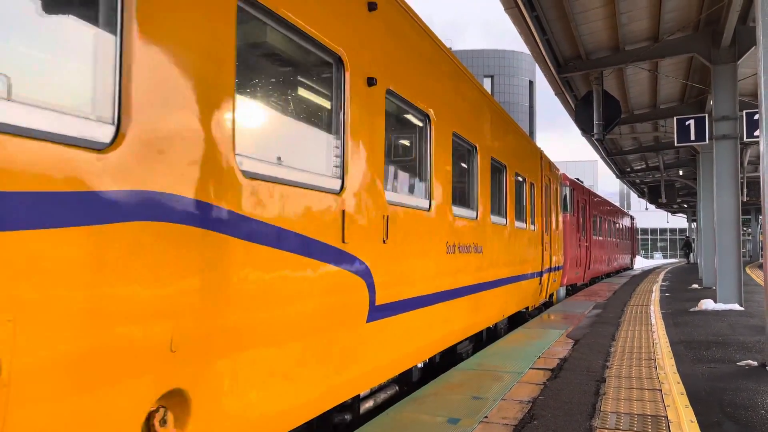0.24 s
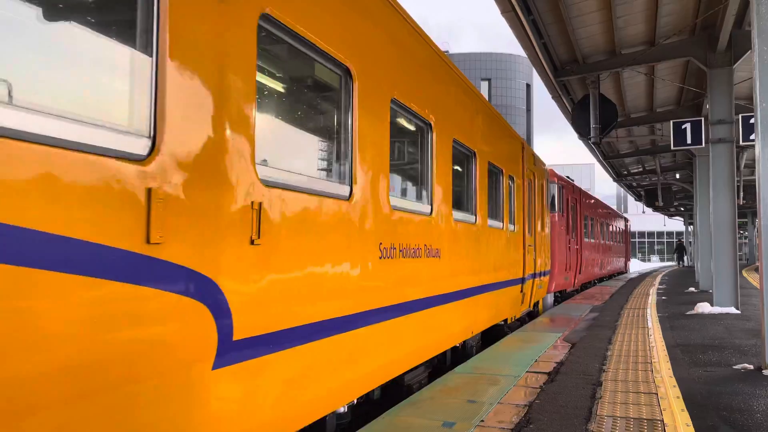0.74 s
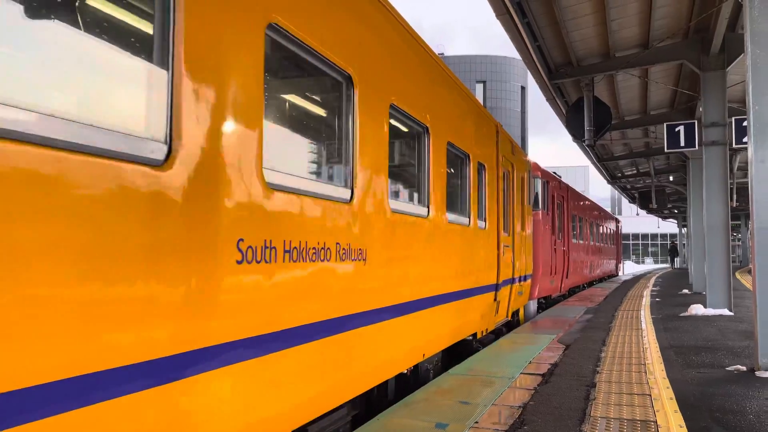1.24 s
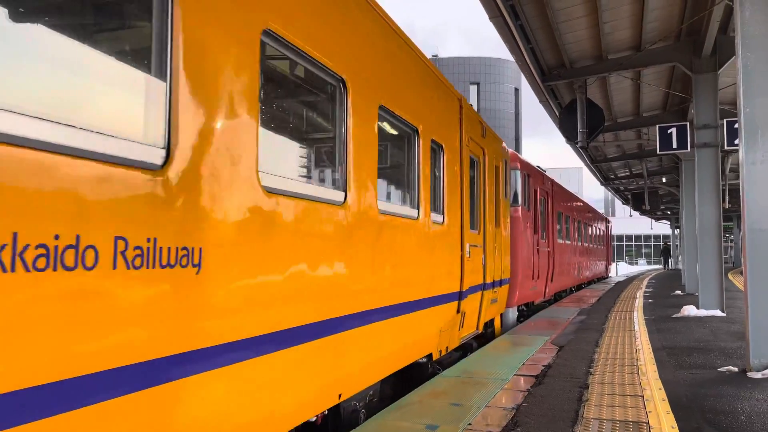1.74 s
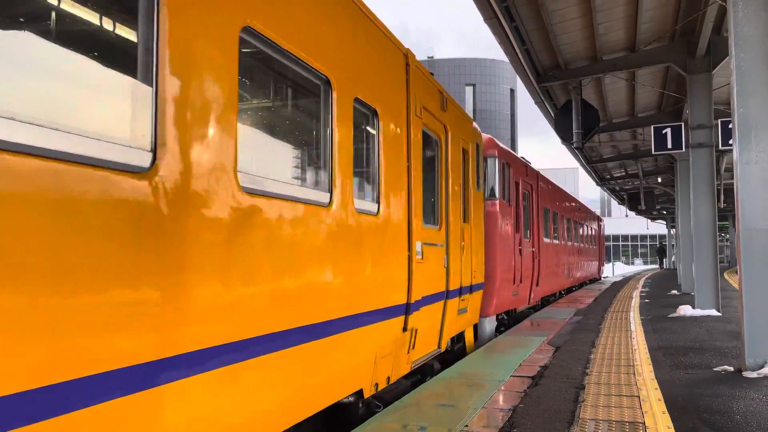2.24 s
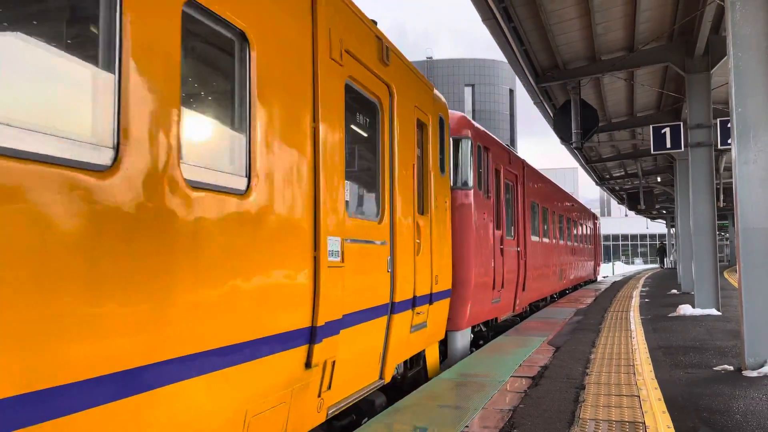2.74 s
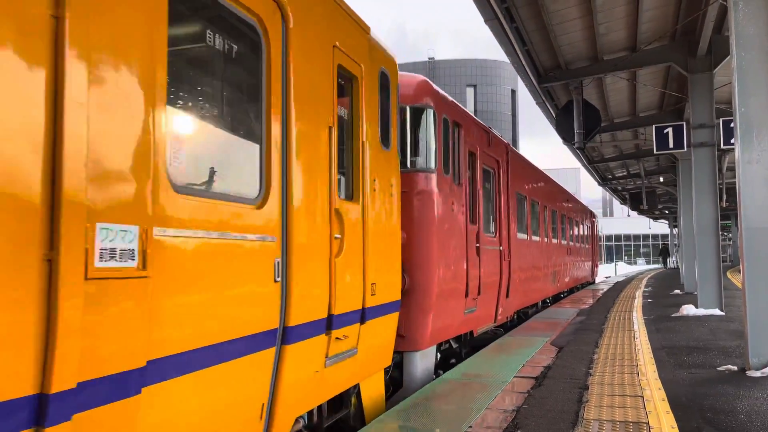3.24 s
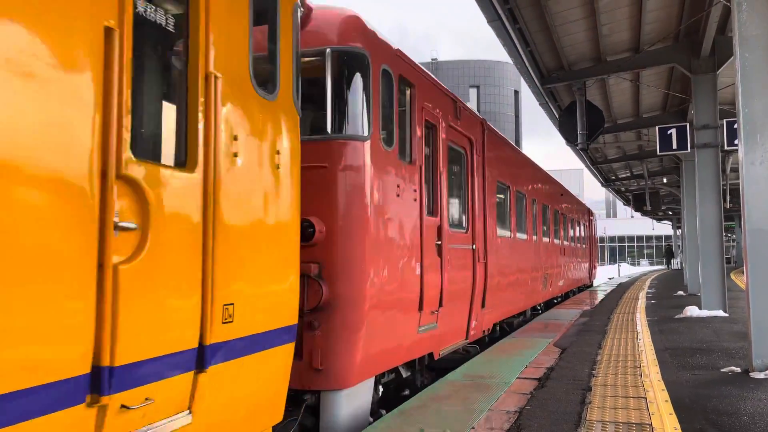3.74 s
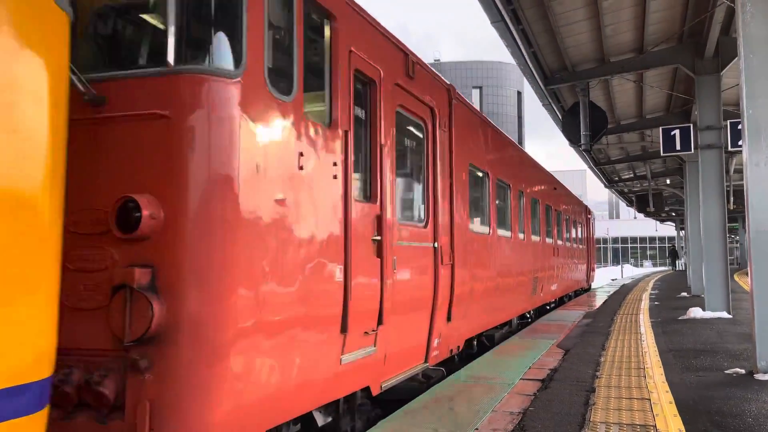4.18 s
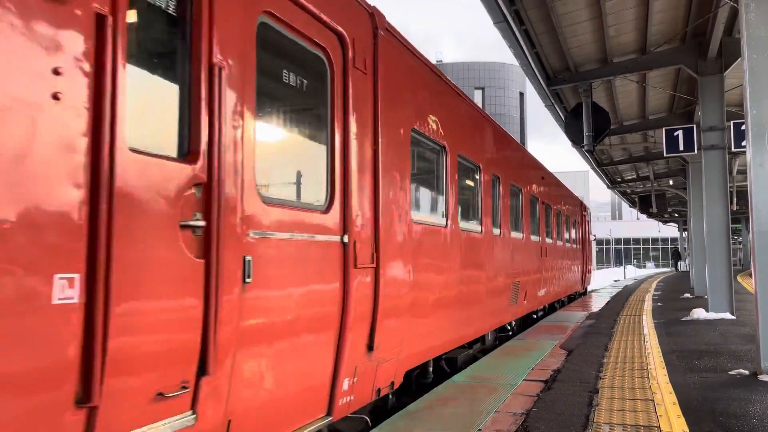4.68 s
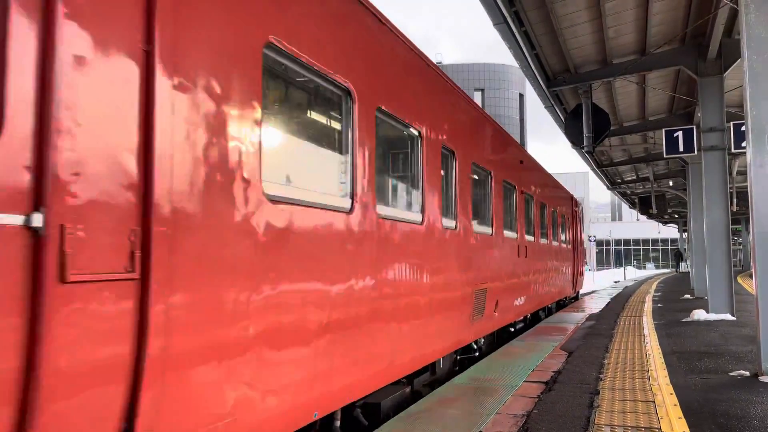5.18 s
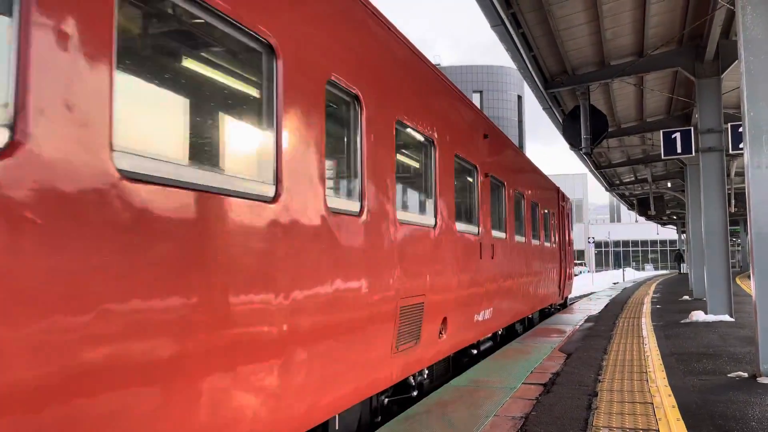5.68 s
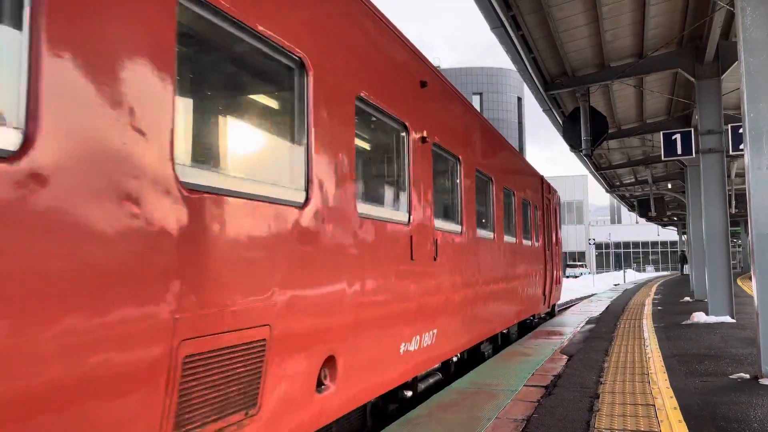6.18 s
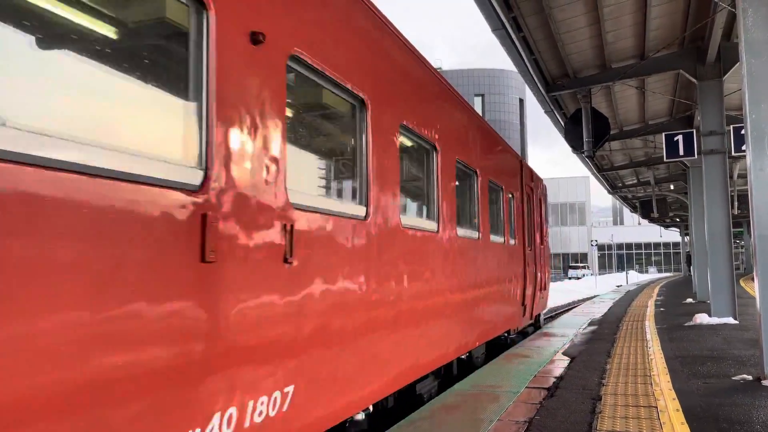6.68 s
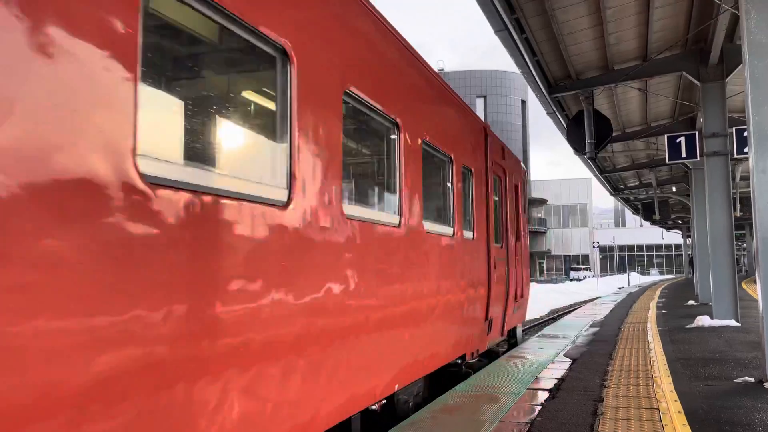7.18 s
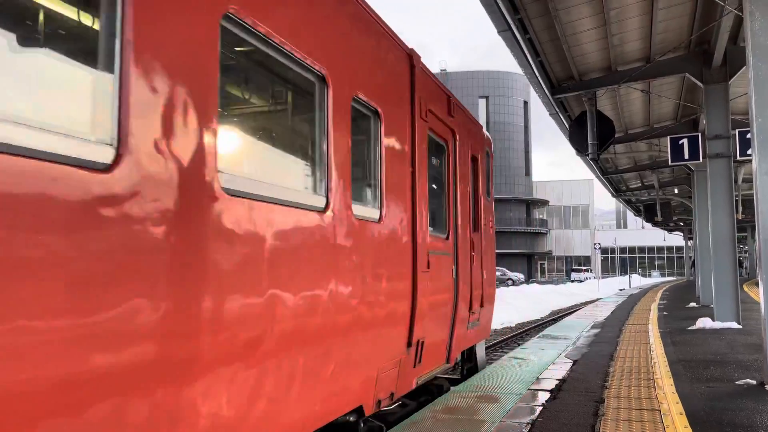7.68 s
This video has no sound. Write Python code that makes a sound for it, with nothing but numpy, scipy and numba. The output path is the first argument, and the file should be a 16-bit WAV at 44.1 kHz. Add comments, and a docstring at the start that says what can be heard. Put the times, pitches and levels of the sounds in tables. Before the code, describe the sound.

Two diesel railcars accelerate past a handheld stereo phone on a roofed platform, close enough for under-floor detail. From 0 s the front engine growls low and unsteadily while the rear one idles beneath; wheel rumble, fan hiss and fluttering roar swell. Soft joint thuds come near 0.1 and 0.5 s, with a short air puff at 0.5 s. Metallic clatter and ticks peak between 1.2 and 2.9 s, with sharper casing knocks around 2.1 to 3 s. The rear engine then revs upward, swelling to a deep, heavy boom at about 3.9 s, wavering and staying strong until 5.4 s. Gear whine climbs with speed; further thuds fall near 3.6, 5.5 and 5.9 s. After 6 s the boom fades under rumble, a steady low hum and another wave of engine-room roar and hiss near 7 s. A thin, high fluttering air whistle emerges around 7.5 s and continues to the end, as the train is still passing.

```python
"""A diesel engine already pulling growls at the front while the one behind it idles: two railcars leaving.
The rear engine revs up and booms as its exhaust comes level; under-floor roar, clatter and gear whine pass by.
Joint thuds come now and then; a puff of air comes early, and an air valve whistles near the end.
Engines, hum and gear are sine tones locked to shafts; roar, clatter and air are filtered noise.
Two microphone ports hear it all with reflections from roof and platform."""
import sys
import numpy as np
from scipy import signal
from scipy.fft import rfft, irfft
from scipy.io import wavfile
from scipy.ndimage import uniform_filter1d, map_coordinates
from numba import njit

SR = 44100
rng = np.random.default_rng(int(sys.argv[2]) if len(sys.argv) > 2 else 0)


def to_linear_factor(level_db):
    """Convert decibel levels (scalar or array-like) to linear amplitude factors."""
    exponent = np.asarray(level_db, float) / 20
    return 10 ** exponent


def output_pcm(signal):
    """Save a mono or channel-first signal as 16-bit PCM at the path in sys.argv[1].

    Samples are clipped to [-1, 1] before scaling.
    """
    pcm = np.clip(np.atleast_2d(signal).T, -1, 1) * 32767
    wavfile.write(sys.argv[1], SR, np.round(pcm).astype(np.int16))


N = 349272
T = np.arange(N) / SR
HZ = np.fft.rfftfreq(N, 1 / SR) + 1e-3  # kept above zero for the logarithm


def curves(table):
    """Columns of a table joined by straight lines in time."""
    s, *columns = np.transpose(table)
    return [np.interp(T, s, column) for column in columns]


def unit(x):
    """Scale to rms 1."""
    return x / np.sqrt(np.mean(x ** 2))


def over_hz(table, column=1):
    """A table column read on a log-frequency axis."""
    table = np.array(table, float)
    return np.interp(np.log(HZ), np.log(table[:, 0]), table[:, column])


def noise():
    """Two unrelated noises: the direct sound and what comes back from roof and platform."""
    return rng.standard_normal((2, N))


def coloured(x, points):
    """Filter by (pitch_hz, relative_db) points, silent beyond the ends, then scale to rms 1."""
    inside = (HZ > points[0][0]) & (HZ < points[-1][0])
    return unit(irfft(rfft(x) * to_linear_factor(over_hz(points)) * inside, N))


@njit
def svf(x, hz, width):
    """State-variable band-pass whose centre may move."""
    y, band, low = np.empty(len(x)), 0., 0.
    for i in range(len(x)):
        g, k = np.tan(np.pi * hz[i] / SR), width / hz[i]
        v = (band + g * (x[i] - low)) / (1 + g * (g + k))
        band, low, y[i] = 2 * v - band, low + 2 * g * v, k * v
    return y


def ring(pair, hz, width_hz):
    """A steep resonance on both noises: two equal band-passes in a row."""
    hz, width_hz = hz + 0 * T, float(width_hz)
    return unit(np.array([svf(svf(x, hz, width_hz), hz, width_hz) for x in pair]))


def walk(rate):
    """Random levels held 1 / rate s and slewed twice; spread 1."""
    hold = int(SR / rate)
    steps = np.repeat(rng.standard_normal(N // hold + 1), hold)
    return unit(uniform_filter1d(uniform_filter1d(steps, hold), hold)[:N])


def burst(events, decay_s):
    """Envelope of sudden starts that die away."""
    return sum(to_linear_factor(db) * (T >= s) * np.exp(-np.clip(T - s, 0, None) / decay_s) for s, db in events)


def orders(hz, db, others, waver_db, wander_hz):
    """Tones locked to a shaft: the main one and its other orders, each wavering on its own."""
    turn = np.cumsum(hz + wander_hz * walk(6)) / SR
    tones = 0
    for k, level_db in [(1, db)] + others:
        # higher orders are rougher
        level = to_linear_factor(level_db + waver_db * k ** 0.68 * walk(9 * k))
        tones = tones + np.sqrt(2) * level * np.sin(2 * np.pi * (k * turn + rng.random()))
    return tones, turn


def crossing(hz, swells, base_db=0):
    """Each order is loudest on its resonance and 6 dB down half a width away."""
    return [(k, base_db + peak_db - 6 * ((k * hz - res_hz) / half_hz) ** 2)
            for k, res_hz, half_hz, peak_db in swells]


# train speed: time_s, speed_m_s
TRAIN_SPEED = [(0, 4.6), (2.8, 5.34), (4, 5.98), (5.1, 6.7), (7.92, 7.97)]


def passing(parts, falloff, rest_db=-90):
    """Level in dB of parts that slide past at train speed, over what the rest of the train gives."""
    along = np.cumsum(curves(TRAIN_SPEED)[0]) / SR  # metres travelled
    power = sum(to_linear_factor(2 * db) * (1 + ((along - np.interp(s, T, along)) / reach) ** 2) ** -falloff
                for s, reach, db in parts)
    return 10 * np.log10(power + to_linear_factor(2 * rest_db))


# fans sliding past: abreast_s, reach_m, level_db
FANS_PASSING = [(1.5, 9.3, -37), (7.2, 5, -29)]
# fan hiss spectrum: pitch_hz, relative_db
HISS_COLOUR = [(1500, -12), (2700, -6), (3400, -0.5), (4500, -2.5), (5600, -8.5), (7500, -2.5), (9000, -9),
               (11000, -18), (13000, -21.5), (16500, -21)]
# treble lost by the far fans: pitch_hz, relative_db
FAR_FANS_COLOUR = [(1500, 0), (7000, -3), (16500, -7)]


def fan_hiss():
    """Fans stir broadband air noise: near ones pass by over a steady, duller far hiss."""
    near = to_linear_factor(passing(FANS_PASSING, falloff=1.22) + 0.76 * walk(6.5)) * coloured(noise(), HISS_COLOUR)
    far = to_linear_factor(-39) * coloured(coloured(noise(), HISS_COLOUR), FAR_FANS_COLOUR)
    return near + far


# wheels sliding past: abreast_s, reach_m, level_db
WHEELS_PASSING = [(1.7, 7.4, -25.5), (6.8, 13.7, -24.5)]
# wheel rumble spectrum: pitch_hz, relative_db
RUMBLE_COLOUR = [(18, -29), (30, -13), (42, -10), (60, 3), (100, -1.5), (150, -2.5), (220, -4.5), (330, -7),
                 (500, -10), (800, -25.5)]


def wheel_rumble():
    """Rolling wheels give low noise that swells as they pass."""
    level_db = passing(WHEELS_PASSING, falloff=1.13, rest_db=-28.5) + 1.06 * walk(7)
    return to_linear_factor(level_db) * coloured(noise(), RUMBLE_COLOUR)


# engine rooms sliding past: abreast_s, reach_m, level_db
ROOMS_PASSING = [(1.5, 7.6, -21), (2.7, 2.4, -20.5), (7.15, 4.8, -17.5)]
# roar spectrum: pitch_hz, relative_db
ROAR_COLOUR = [(200, -19.5), (350, -5), (600, -1), (950, 0), (1250, -3.5), (1550, -5), (1850, -6),
               (2600, -17.5), (4000, -27)]
# two bands of the roar that flutter on their own: pitch_hz, width_hz, level_db against the roar
ROAR_BANDS = [(981, 280, -10), (1480, 220, -14.5)]


def engine_room_roar():
    """Engine rooms give broad mid-range noise, with two bands that flutter on their own."""
    level_db = passing(ROOMS_PASSING, falloff=1.47, rest_db=-26.0) + 1.02 * walk(4.97)
    bands = sum(to_linear_factor(db + 2.73 * walk(9)) * ring(noise(), hz, width) for hz, width, db in ROAR_BANDS)
    return to_linear_factor(level_db) * (coloured(noise(), ROAR_COLOUR) + bands)


# knocks on the casing: start_s, level_db
CASING_KNOCKS = [(2.115, -31), (2.455, -30), (2.606, -21), (2.64, -23), (2.72, -25), (2.961, -27)]


def ringing_casing(casing_db):
    """A casing resonates on noise, with short knocks on top."""
    level = to_linear_factor(casing_db + 1.15 * walk(14)) + burst(CASING_KNOCKS, decay_s=0.015)
    return level * ring(noise(), hz=2118, width_hz=510)


# two places humming under the rear car: abreast_s, reach_m, level_db
HUM_PASSING = [(6.4, 3.1, -26), (7.75, 5.9, -25.5)]
# hum overtones: order, level_db against the main tone at 7 s
HUM_OVERTONES = [(1 / 2, -18), (3 / 2, -7.5), (2, -4.5), (3, -11.5)]


def under_car_hum():
    """A hum of steady pitch under the rear car; its overtones gain on the main tone."""
    hum_db = passing(HUM_PASSING, falloff=2.2)
    rise_db_per_s = 3.5
    overtones = [(k, hum_db + db + rise_db_per_s * (T - 7)) for k, db in HUM_OVERTONES]
    return orders(145.1, hum_db, overtones, waver_db=1.8, wander_hz=0.097)[0]


# gears sliding past: abreast_s, reach_m, level_db
GEAR_PASSING = [(1.9, 9.2, -31.5), (4.6, 3.1, -30.5)]


def gear_whine():
    """Meshing teeth sound one tone whose pitch follows train speed."""
    hz_per_m_s = 32
    mesh_hz = hz_per_m_s * curves(TRAIN_SPEED)[0]
    return orders(mesh_hz, passing(GEAR_PASSING, falloff=3.0), [], waver_db=0.5, wander_hz=0.3)[0]


# wheels over rail joints: start_s, level_db before the thud's envelope, pitch_hz
RAIL_JOINTS = [(.126, -8, 285), (.457, -10, 141), (3.605, -2, 170), (5.452, 0, 290), (5.936, -11, 280)]


def joint_thuds():
    """Wheels thud over rail joints: short sines, softly struck and quickly damped."""
    out = 0
    for s, db, hz in RAIL_JOINTS:
        after = np.clip(T - s, 0, None)
        envelope = np.exp(-after / .005) * (1 - np.exp(-after / .003))
        out = out + to_linear_factor(db) * np.sin(2 * np.pi * hz * after) * envelope
    return out


def air_puff():
    """One short puff of air: a softened burst of noise."""
    puff = uniform_filter1d(burst([(0.53, -22)], decay_s=0.065), size=600)
    return puff * coloured(noise(), [(500, -4), (1500, 0), (3000, 3), (6000, -9), (12000, -21)])


# whistling air valve sliding past: abreast_s, reach_m, level_db
VALVE_PASSING = [(7.53, 2.47, -25.5), (7.9, 4.5, -25.5)]


def valve_whistle():
    """Air through a narrow gap whistles: noise in a narrow resonance, fluttering."""
    level_db = passing(VALVE_PASSING, falloff=3.2) + 1.5 * walk(35)
    return to_linear_factor(level_db) * ring(noise(), hz=5105, width_hz=120)


# valve gear sliding past: abreast_s, reach_m, level_db
CLATTER_PASSING = [(1.2, 8.4, -34.5), (2.5, 6.2, -33)]
# cover resonances: pitch_hz at the start, width_hz, relative_db
COVER_MODES = [(3770, 430, -1.5), (6140, 380, -6), (7420, 490, -3), (8630, 2800, -7)]
# sharper ticks: start_s, level_db at onset
CLATTER_TICKS = [(1.32, -37), (1.714, -32), (2.174, -33), (2.3705, -32), (2.5546, -33), (2.7194, -39),
                 (2.7995, -38), (2.9194, -33)]


def valve_clatter(turn, front_hz):
    """Rear firings shake the covers, every third harder; cover pitch follows the front engine."""
    rise = np.minimum(front_hz / front_hz[0], 1.12)
    knock = turn / 3 + .3
    size = to_linear_factor(3.0 * rng.standard_normal(N // 100))[knock.astype(int)]  # no two knocks alike
    gate = 0.72 + 0.78 * size * np.exp(-(knock % 1) / 0.44) + .3 * np.exp(-(turn % 1) / .3)
    drive = gate * to_linear_factor(1.3 * walk(6.04)) * noise()
    covers = sum(to_linear_factor(db) * ring(drive, hz * rise, width) for hz, width, db in COVER_MODES)
    tick_colour = [(4000, -15), (6200, -2), (9500, -1), (11000, -10), (13500, -24)]
    ticks = burst(CLATTER_TICKS, decay_s=0.039) * coloured(noise(), tick_colour)
    return to_linear_factor(passing(CLATTER_PASSING, falloff=2.13)) * unit(covers) + ticks


# front engine firing tone: time_s, pitch_hz, level_db
FRONT_FIRING = [(0, 69.75, -30.5), (.65, 70.4, -27), (1.1, 70.3, -36.5), (1.5, 70.76, -29),
                (2.1, 71.3, -29.5), (2.4, 71.9, -24.5), (2.8, 74, -26), (3.5, 78.6, -20), (3.8, 81.7, -31),
                (4.1, 82.6, -40), (5, 86.5, -45), (7, 92, -44), (7.4, 89.5, -35), (7.92, 85, -38)]
# its other orders: order, resonance_hz, half_width_hz, peak_db against the firing tone
FRONT_RESONANCES = [(1 / 2, 46, 3.7, 2), (3 / 2, 105.7, 3.6, -7), (3 / 2, 136.8, 7.4, 2.4), (2, 142, 4, -5),
                    (2, 178, 8.4, 1)]


def front_engine():
    """Firing tone of the engine already pulling; other orders swell as they cross resonances."""
    hz, db = curves(FRONT_FIRING)
    tones, _ = orders(hz, db, crossing(hz, FRONT_RESONANCES, db), waver_db=2.5, wander_hz=0.37)
    return tones, hz


# rear engine firing tone: time_s, pitch_hz, level_db before the dips
REAR_FIRING = [(0, 44.83, -34.5), (2.4, 45.87, -35), (2.95, 52.04, -29), (3.2, 55.8, -23),
               (3.48, 60.5, -17.5), (3.9, 65.67, -7.5), (4.02, 67.37, -11), (4.4, 71.5, -16),
               (4.6, 73.46, -14), (4.8, 75.1, -11.5), (5.3, 78.13, -10), (5.45, 79.1, -14),
               (5.74, 79.94, -27), (5.9, 80, -23), (6.2, 81.2, -32), (6.5, 82.37, -24), (7.92, 84.4, -38)]
# its other orders on pipe or panel resonances: order, resonance_hz, half_width_hz, peak_db
REAR_RESONANCES = [(2, 102, 4.5, -29.5), (3 / 2, 105.2, 3, -20.5), (2, 125.7, 2.5, -25.5),
                   (2, 142.5, 6, -22.5), (2, 164.5, 2, -30.5), (3, 217, 5, -30), (3, 229, 6, -25.5),
                   (43 / 6, 431, 7, -28.5), (41 / 6, 435, 8, -27.5), (13 / 2, 439.2, 9.5, -20),
                   (19 / 3, 446, 5.5, -29), (17 / 3, 440, 3.3, -27), (49 / 6, 495, 8.5, -31),
                   (47 / 6, 499, 11, -31.5), (15 / 2, 501, 6.3, -26), (19 / 3, 502, 6.1, -33.5)]
# brief dips in the boom: centre_s, depth_db
BOOM_DIPS = [(4.08, -9), (4.25, -5)]


def rear_engine():
    """Firing tone from idle to boom; other orders swell as they cross a pipe or panel resonance."""
    hz, db = curves(REAR_FIRING)
    dip_s = 0.038  # from a dip's centre to 1/e of its depth
    db = db + sum(depth * np.exp(-((T - s) / dip_s) ** 2) for s, depth in BOOM_DIPS)
    return orders(hz, db, crossing(hz, REAR_RESONANCES), waver_db=1.25, wander_hz=0.248)


# the two microphone ports: pitch_hz, left_minus_right_db, likeness_0_to_1, left_lead_rad
PORT_PAIR = [(60, 0, .995, 0), (200, 0, .93, .15), (450, 1.8, .72, .2), (900, 1, .62, .3),
             (1400, .6, .42, .3), (1800, -3, .3, 0), (2200, 0, .65, 0), (3200, 2.8, .5, .8),
             (4700, 1, .6, .1), (5700, 1.5, .3, -.3), (6500, 1, .4, -2.6), (6950, 0, .99, -3.14),
             (8200, 0, .99, -3.14), (8500, 0, .7, -3.8), (9800, 0, .65, -5.3), (10300, 0, .99, -6.28),
             (12200, 0, .99, -6.28), (13000, 0, .3, -8.5), (13800, 0, .995, -9.42)]


def ports(direct, back, lag_ms):
    """The right port hears the direct sound shifted in phase and mixed with reflections; lows reach it late."""
    tilt_db, like, lead = (over_hz(PORT_PAIR, column=k) for k in (1, 2, 3))
    like = np.clip(like, 0, 1)
    left = irfft(rfft(direct) * to_linear_factor(tilt_db / 2), N)
    shifted = like * np.exp(-1j * lead) * rfft(direct)
    reflected = np.sqrt(1 - like ** 2) * rfft(back)
    right = (shifted + reflected) * to_linear_factor(-tilt_db / 2)
    low = 1 / (1 + (HZ / 1850) ** 16)  # share of each pitch that lags
    late_at = np.arange(N) - lag_ms * SR / 1000
    late = map_coordinates(irfft(right * low, N), [late_at], order=3, mode="nearest")
    return np.array([left, late + irfft(right * (1 - low), N)])


# ringing casings sliding past: abreast_s, reach_m, level_db
CASINGS_PASSING = [(1.2, 6.2, -31.5), (2.8, 4.1, -25.5), (7.9, 6.2, -25.5)]


def scene():
    """Engines, wheels and air as the two ports hear them."""
    casing_db = passing(CASINGS_PASSING, falloff=1.45, rest_db=-37.5)
    front, front_hz = front_engine()
    rear, turn = rear_engine()
    tones = under_car_hum() + gear_whine() + joint_thuds() + front + rear
    under_floor = fan_hiss() + wheel_rumble() + engine_room_roar() + ringing_casing(casing_db)
    direct, back = under_floor + air_puff() + valve_whistle() + valve_clatter(turn, front_hz)
    # the lag between the ports grows with the casing level
    lag_ms = np.interp(casing_db, [-33.5, -25], [0.082, 0.27])
    # tones come back off the roof a little later
    return ports(direct + tones, back + np.roll(tones, shift=round(.004 * SR)), lag_ms)


def top_cut(x):
    """Nothing passes above the cut-off."""
    return signal.sosfilt(signal.butter(12, 15800, fs=SR, output="sos"), x)


def record(dry):
    """The phone rounds the loudest peaks."""
    rounded = np.tanh(.6 * dry) / .6
    return top_cut(rounded)


dry = scene()
out = record(dry)
output_pcm(out)
```